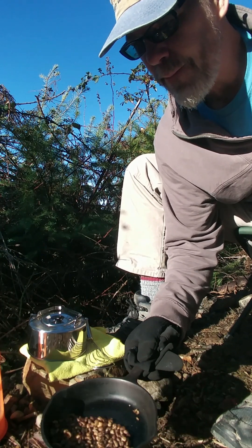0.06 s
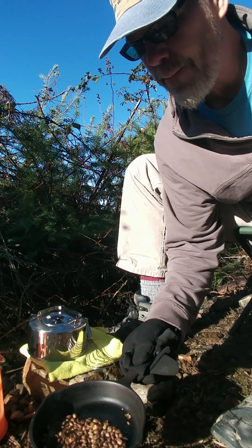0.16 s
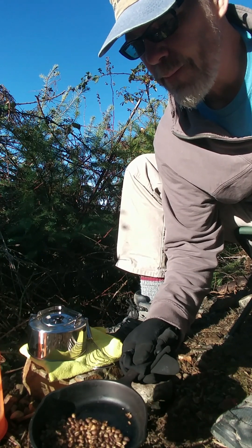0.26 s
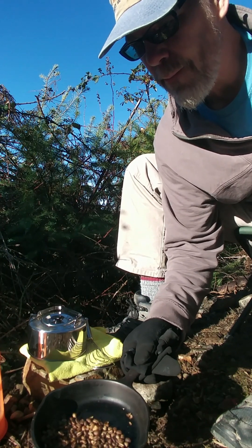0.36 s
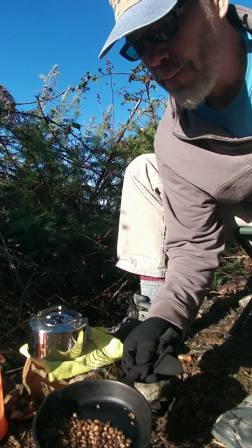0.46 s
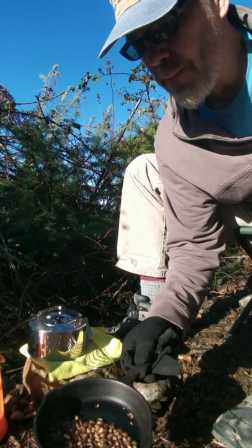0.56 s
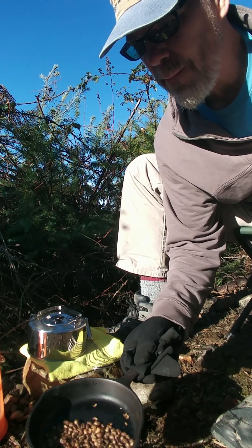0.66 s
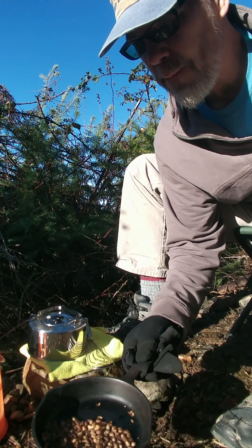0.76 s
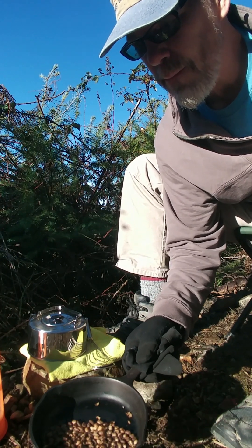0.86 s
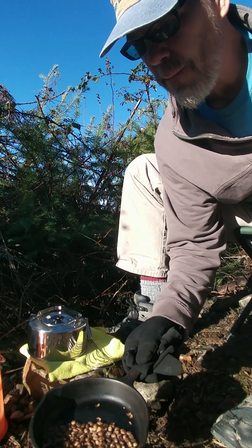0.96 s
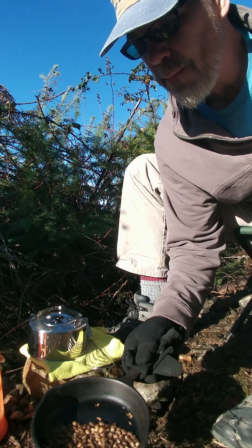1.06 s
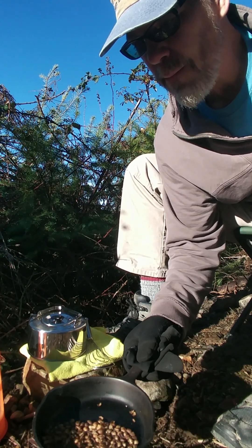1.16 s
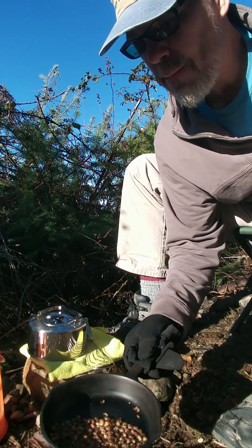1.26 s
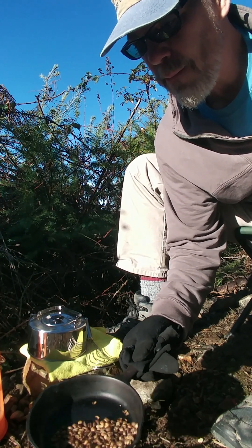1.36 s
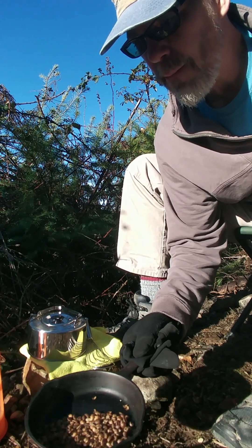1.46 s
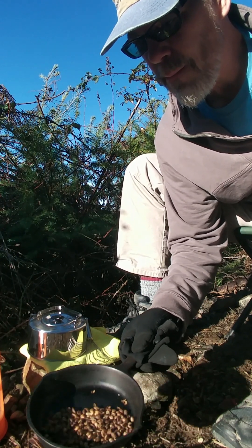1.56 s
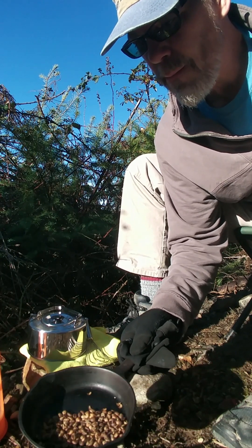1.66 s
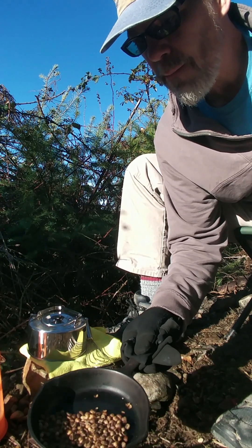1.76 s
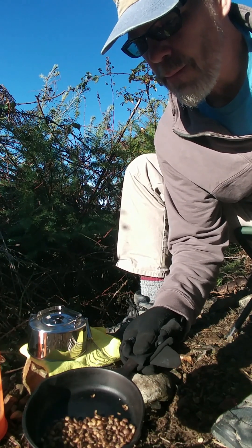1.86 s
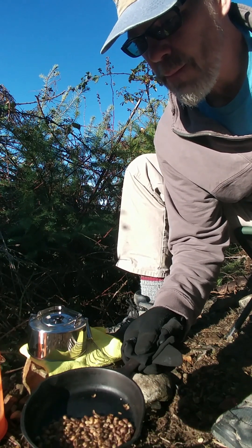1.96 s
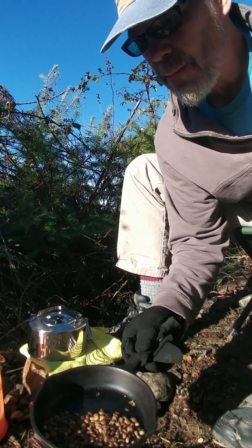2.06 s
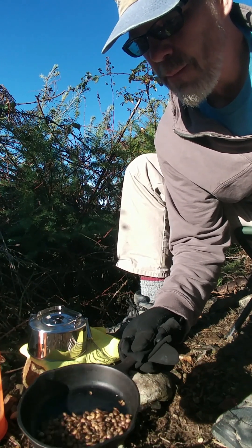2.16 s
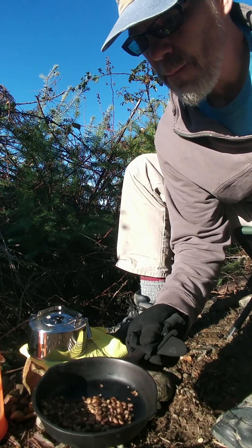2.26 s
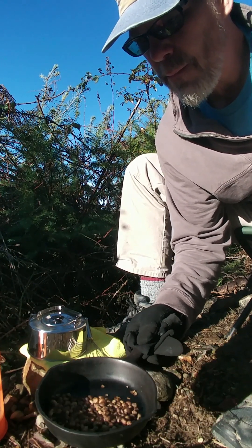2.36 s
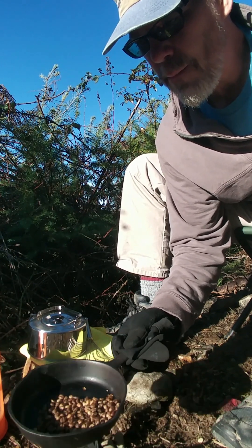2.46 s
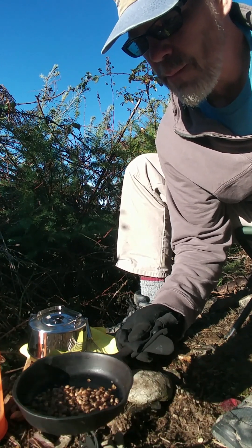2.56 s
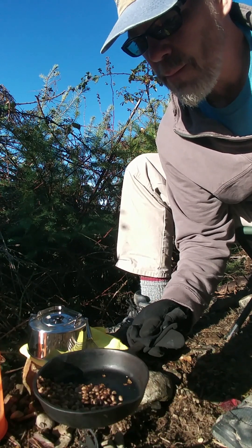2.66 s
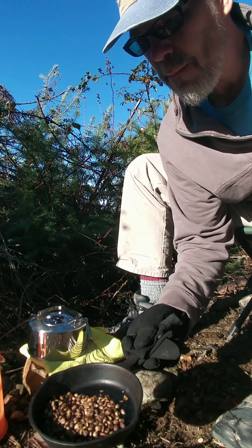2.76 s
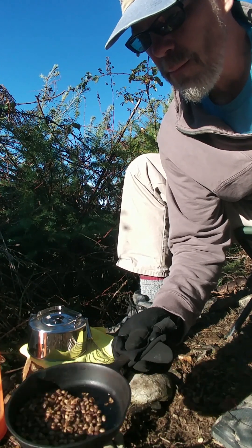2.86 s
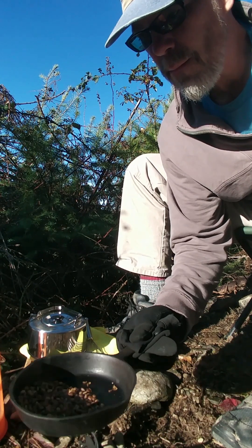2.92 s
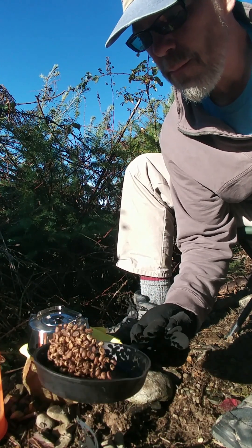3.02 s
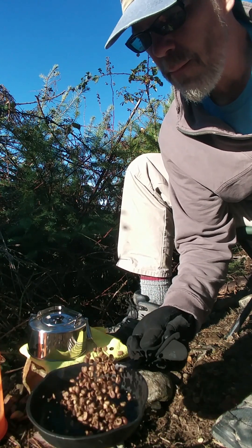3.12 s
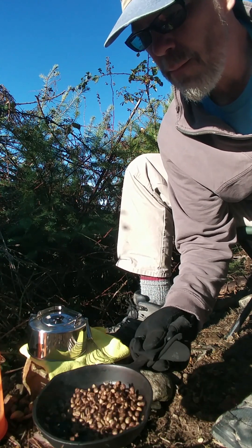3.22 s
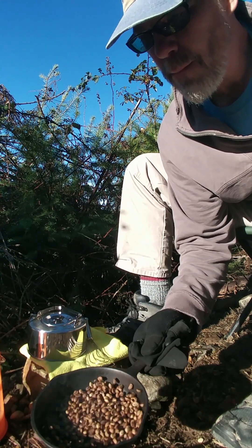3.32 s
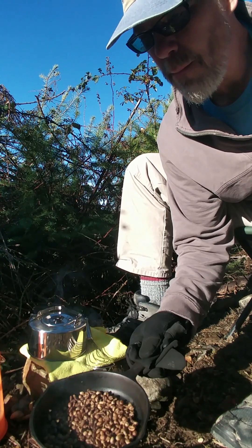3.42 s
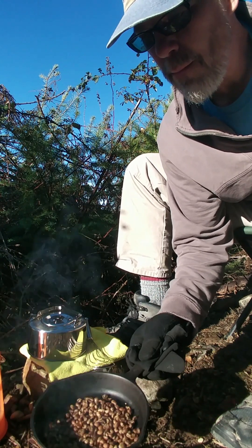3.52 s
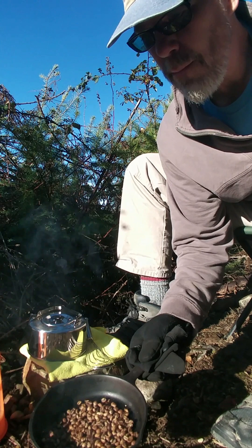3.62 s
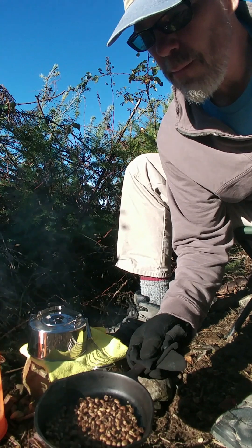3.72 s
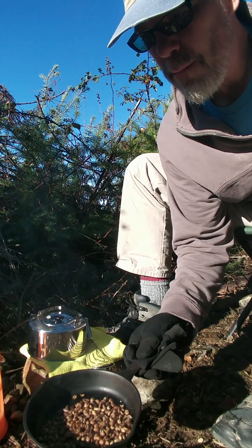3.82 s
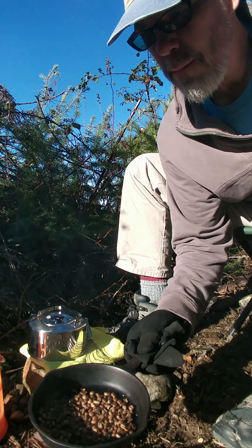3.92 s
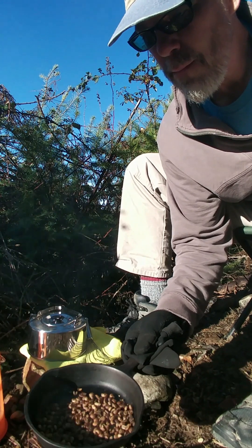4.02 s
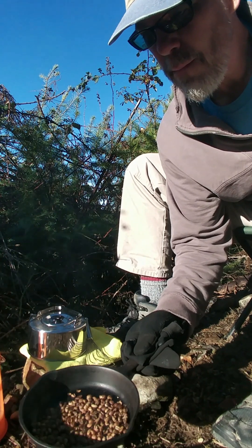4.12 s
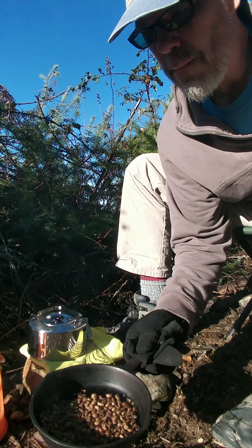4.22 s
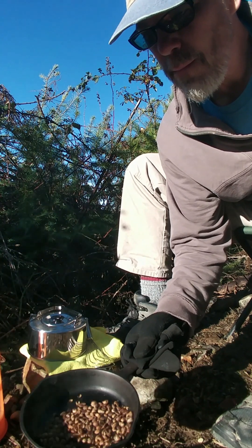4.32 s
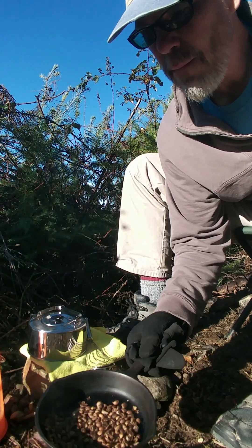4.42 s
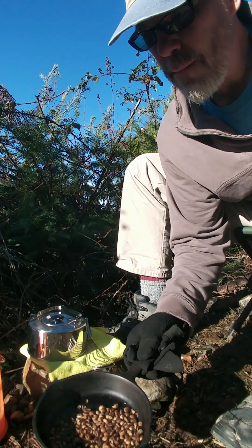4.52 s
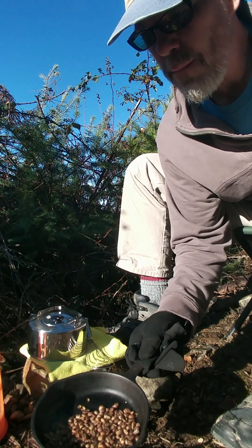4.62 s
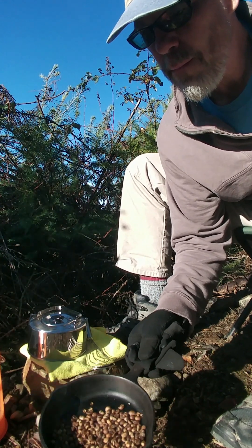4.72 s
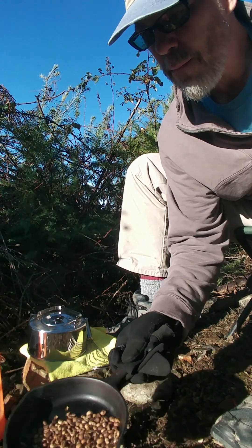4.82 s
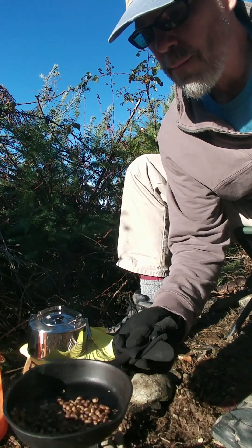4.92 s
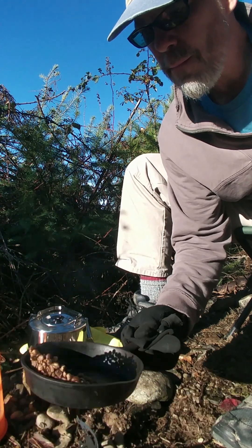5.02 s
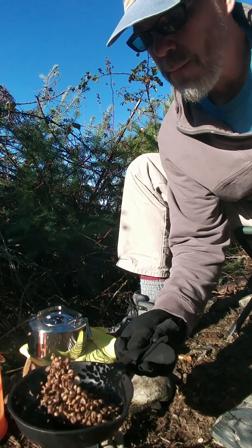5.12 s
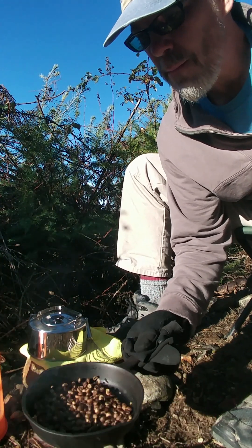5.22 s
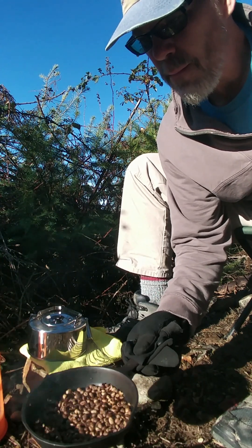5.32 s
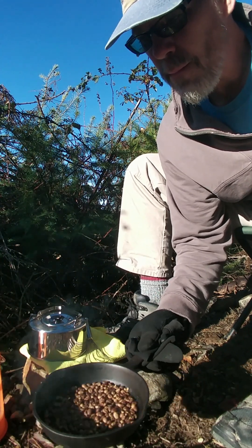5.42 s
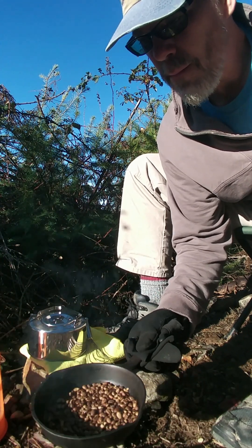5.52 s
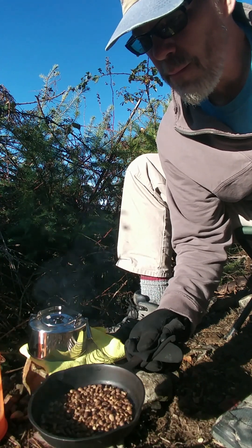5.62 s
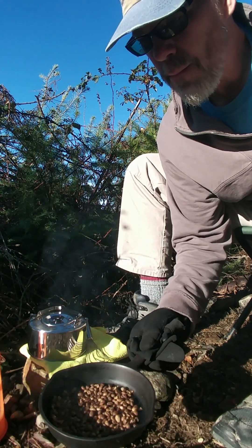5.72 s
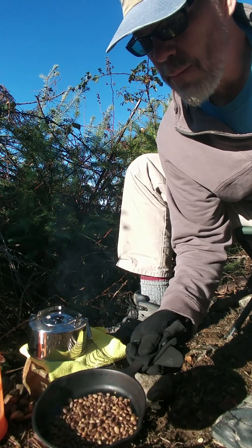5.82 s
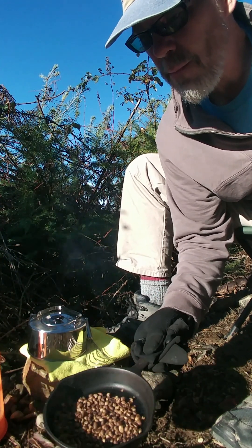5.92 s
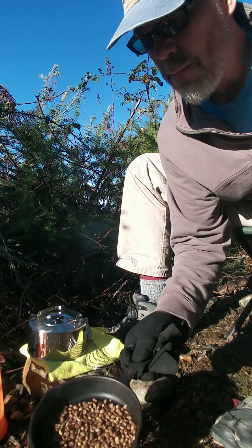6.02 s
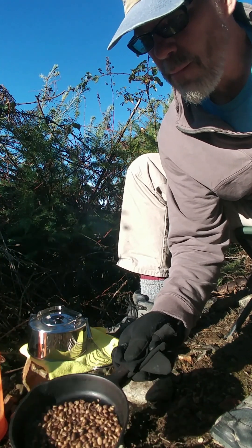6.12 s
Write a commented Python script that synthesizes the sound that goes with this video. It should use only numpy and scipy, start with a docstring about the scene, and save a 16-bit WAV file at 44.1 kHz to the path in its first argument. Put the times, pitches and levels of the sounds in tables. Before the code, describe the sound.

Coffee beans crack sharply and roll in a small metal pan, tossed twice with ringing clatter over a softly roaring, hissing gas burner outdoors.

```python
"""Coffee beans crack, roll and are tossed twice in a small metal pan over a camping burner outdoors.
Cracks are filtered snaps with steam; moving beans are random taps that ring the pan's modes and tick.
The flame roars and the gas hisses as coloured noise. Far off a machine hums and an engine pulls away
through its gears, both as wavering tones. A phone hears pan and burner from its right, a metre away."""
import sys
import numpy as np
from scipy import signal
from scipy.fft import rfft, irfft
from scipy.io import wavfile
from scipy.ndimage import uniform_filter1d

SR = 44100
rng = np.random.default_rng(int(sys.argv[2]) if len(sys.argv) > 2 else 0)


def to_wav(s):
    """Save 16-bit WAV."""
    ch = np.atleast_2d(s).T  # columns
    pcm = np.round(np.clip(ch, -1, 1) * 32767)  # PCM
    wavfile.write(sys.argv[1], SR, pcm.astype(np.int16))


N = 272538

PAN_LAG, FLAME_LAG = 11, 12  # samples by which the left port hears later


def undb(db):
    """Turn decibels into an amplitude factor."""
    return 10 ** (np.asarray(db) / 20)


def curves(table):
    """Draw straight lines through rows (t/s, ..); give each column at every sample."""
    s, *columns = np.transpose(table)
    return [np.interp(np.arange(N) / SR, s, column) for column in columns]


def colour(x, points, size=8192):
    """Filter by a response through points (f/Hz, level/dB) that never sounds ahead of its input."""
    hz, db = np.transpose(points)
    grid_hz = np.arange(1, size // 2 + 2) * SR / size
    response_db = np.interp(np.log(grid_hz), np.log(hz), db)
    # folding the cepstrum (the spectrum of the log response) gives minimum phase
    cepstrum = irfft(np.log(undb(response_db)))
    cepstrum[1:size // 2] *= 2
    cepstrum[size // 2 + 1:] = 0
    impulse = irfft(np.exp(rfft(cepstrum)))
    return signal.oaconvolve(np.atleast_2d(x), impulse[None], axes=-1)[:, :np.shape(x)[-1]]


def band(x, hz, width):
    """Resonate around one frequency, with gain 1 at the centre."""
    return signal.lfilter(*signal.iirpeak(hz, hz / width, fs=SR), x)


def unit(x):
    """Scale to mean power 1."""
    return x / np.sqrt(np.mean(x ** 2))


def walk(rate):
    """Wander at random with a spread near 1: levels held for 1 / rate seconds, smoothed twice."""
    hold = int(SR / rate)
    steps = np.repeat(rng.standard_normal(N // hold + 1), hold)
    return unit(uniform_filter1d(uniform_filter1d(steps, hold), hold)[:N])


def ports(like, lag, apart_hz=350):
    """White noise of 0 dB per Hz at two ports: alike in the bass, less so above, later on the left."""
    right, other = rng.standard_normal((2, N)) * np.sqrt(SR / 2)
    high_pass = signal.butter(2, apart_hz, "high", fs=SR)
    difference = signal.lfilter(*high_pass, np.roll(other - right, lag))
    return np.array([np.roll(right, lag) + (1 - like) * difference, right])


def cracks(scatter_db=-24, scatter_t60=0.03, ground_s=.0026, ground=0.21, like=0.24, rise_s=0.0028, gain_db=4):
    """A shell splits in a snap that pan wall and ground throw back; steam fizzes out after it."""
    # cracking beans: t/s (the snap sounds at t + 0.001286 s), peak of the snap before gain_db/dB,
    # thud/dB, shell/dB, split/dB, air/dB, pitch of the shell band f/Hz, pan wall echo after/s,
    # steam/dB, steam's 60 dB decay/s, left minus right/dB
    bean_cracks = [(0.049, -47, -22, -8, -1, -10, 4500, .0004, -2, .06, -2),
                   (0.6359, -13.5, -14, -2.5, -0.5, 3, 4270, .0004, -13, 0.057, 0.5),
                   (.657, -29, -30, -5, -3, -7, 5000, .0004, -12.5, 0.14, -3),
                   (0.733, -8, -4.5, 1, -11, -14, 4040, .00047, -13, 0.084, 1.5),
                   (1.4759, -2.5, -44, 9, 7.5, 5.5, 5840, .00088, -23, 0.095, -1.5),
                   (1.6067, -18, -26, -6, 0, 5, 4560, .0004, -14.5, 0.093, -2.5),
                   (2.2613, -39.5, -32, -1, -4, -8, 5000, .0004, -8, 0.052, 0),
                   (3.0929, -29, 0.5, -2, -3, -20, 5020, .0004, -11, 0.081, 2),
                   (4.1531, -4, -22.5, -1.5, -1.5, 1.5, 4850, .00025, -14, 0.1, 0.5),
                   (5.5818, -26.5, -9.5, -6.5, -9, -2.5, 4503, .0004, -15, 0.091, 1)]
    # thud, shell, split and air bands: f/Hz (the shell's is set by each bean), width/Hz
    snap_bands = [(1400, 3100), (4200, 3000), (8300, 2040), (13500, 5100)]
    # colour of the steam: f/Hz, level/dB
    steam_colour = [(600, -20), (2500, -15.5), (3200, -4), (4500, -8.5), (6000, 0.5), (8500, -2.5),
                    (12000, -7), (16000, -10)]
    wall = .7  # share that the pan wall throws back
    out = np.zeros((2, N))
    t = np.arange(SR // 6) / SR
    for s, db, *bands_db, shell_hz, wall_s, steam_db, steam_t60, pan_db in bean_cracks:
        click = (t == 0) * 1.
        click = click + wall * np.roll(click, int(wall_s * SR)) + ground * np.roll(click, int(ground_s * SR))
        # neighbouring beans scatter the snap into a short rough tail
        click = click + rng.standard_normal((2, len(t))) * undb(scatter_db - 60 * t / scatter_t60)

        bands = np.array(snap_bands)
        bands[1, 0] = shell_hz
        snap = 0
        for (hz, width), band_db in zip(bands, bands_db):
            part = band(band(click, hz, width), hz, width)
            snap = snap + undb(band_db) * part / np.abs(part).max()
        snap = snap / np.abs(snap).max()

        puff = undb(steam_db - 60 * t / steam_t60) * (1 - np.exp(-t / rise_s))
        right, other = rng.standard_normal((2, len(t))) * puff
        steam = colour(np.array([like * right + (1 - like) * other, right]), steam_colour, size=512)

        balance_db = np.array([[pan_db], [-pan_db]]) / 2
        sound = (snap + steam) * undb(db + gain_db + balance_db)
        snap_s = s + 0.001286
        i = int(snap_s * SR)
        out[0, i + PAN_LAG:i + PAN_LAG + len(t)] += sound[0]
        out[1, i:i + len(t)] += sound[1]
    return out


def swell(start, length, db, rise, fall):
    """Level in dB that climbs to db at start, holds and falls away; slopes in dB per s."""
    t = np.arange(N) / SR - start
    return db - rise * np.maximum(-t, 0) - fall * np.maximum(t - length, 0)


def motion():
    """Ring level and extra dB on low modes, high modes and clatter; the loudest movement sets all four."""
    # beans rolling gently about: t/s, ring level/dB
    rolling = [(0.0, -82.5), (1.25, -80), (1.5, -69), (2.2, -76), (2.9, -66), (3.7, -74), (4.5, -70),
               (5.0, -73), (5.7, -71.5), (6.18, -74.5)]
    # short slides of the heap: start t/s, length/s, ring level/dB, extra on the low modes/dB,
    # extra on the high modes/dB
    heap_slides = [(0.037, 0.057, -63.5, -11, 2.5), (1.30, .06, -65, -6, -6), (2.119, .03, -61.5, -7, -15),
                   (2.25, 0.045, -58, -1.5, 5), (2.385, 0.078, -52, -5.5, -1.5),
                   (2.515, 0.064, -58.5, 5.5, 6.5), (2.776, .035, -51.5, -8.5, 0.5),
                   (2.876, 0.02, -61.5, 4, 0), (3.895, .12, -70.5, 1, -5), (4.266, .08, -67.5, -5, -8),
                   (4.508, .07, -62, -16, -26), (4.738, 0.056, -67, -4, 2), (5.819, 0.058, -62.5, -14, -8),
                   (6.138, .03, -67, 10, 0)]
    # tosses of the heap: bulk starts to land t/s, keeps pouring for/s, ring level at the end/dB,
    # build-up over the pour/dB, extra on the low modes/dB, extra on the high modes at start/dB
    # and at end/dB, extra clatter/dB, stragglers relative to the bulk/dB, stragglers stop after/s
    heap_tosses = [(3.14, .097, -29, 4, -1.5, 4.1, 10.1, 0, -13.5, .3),
                   (5.13, 0.072, -29.5, 7.8, 2.1, 6.3, 1.1, 0, -12.5, 0.17)]
    slide_rise, slide_fall = 700, 392  # dB per s
    toss_rise, toss_fall, straggle_fall = 516, 460, 69.5  # dB per s
    airborne_s = .15  # the rolling hushes this long before the bulk lands
    bare_low_db, bare_clatter_db = 10.5, 8.5  # the first beans strike bare metal
    last_low_db, last_high_db, last_clatter_db = -1.5, -5, 5.5  # later ones fall on beans

    t, flat = np.arange(N) / SR, np.zeros(N)
    roll_db = curves(rolling)[0]
    moves = []
    for s, length, db, low_db, high_db in heap_slides:
        slide_db = swell(s, length, db, slide_rise, slide_fall)
        moves.append((slide_db, flat + low_db, flat + high_db, flat))
    for s, length, db, build_db, deep_db, first_db, bright_db, clatter_db, rest_db, rest_s in heap_tosses:
        roll_db = np.where((t > s - airborne_s) & (t < s), -90, roll_db)
        end = s + length
        stragglers = swell(end, 0, db + rest_db, toss_rise, straggle_fall)
        stragglers = stragglers - toss_fall * np.maximum(t - end - rest_s, 0)
        bulk = swell(s, length, db, toss_rise, toss_fall) - np.interp(t, (s, end), (build_db, 0))
        low = deep_db + np.interp(t, (s, s + length / 2), (bare_low_db, last_low_db))
        high = np.interp(t, (s, end, end + length / 2), (first_db, bright_db, last_high_db))
        ticks = np.interp(t, (s - length / 2, s, end, end + length / 2),
                          (bare_clatter_db, 0, 0, last_clatter_db))
        moves.append((np.maximum(bulk, stragglers), low, high, ticks + clatter_db))
    moves.append((roll_db, flat, flat, flat))
    moves = np.array(moves)
    loudest = moves[:, 0].argmax(axis=0)
    return moves[loudest, :, np.arange(N)].T


def taps(ring_db, idle_rate=1100, toss_rate=3000, spread_db=3.0, clump_db=1.5):
    """Bean impacts of mean power 1; they come in clumps, more per second where the ring is louder."""
    rate = idle_rate + toss_rate * undb(ring_db - ring_db.max()) ** .5
    scatter_db = spread_db * np.minimum(rng.exponential(size=N), 3.5)
    size = undb(scatter_db + clump_db * walk(90))
    hits = rng.random(N) < rate / SR
    # more taps are each made weaker, so that their number does not set the level
    return unit(hits * size * np.sqrt(toss_rate / rate))


def pan(blows, low_db, high_db, apart=0.56, surge_db=2.0, follow=0.68):
    """Every impact rings the modes in its own mix, since each bean lands somewhere else."""
    # how each pan mode rings, before the extras: level/dB, 60 dB decay/s, signed factor for the left port
    pan_modes = [(-8, 0.15, 0.83), (-10.5, 0.13, -0.25), (-5, 0.16, -1.18), (0.5, 0.15, 1.31),
                 (-38, .15, -8), (-15.5, 0.15, 2.5), (-3.5, 0.17, -1), (-15, .15, 1.9),
                 (-7.5, 0.071, -0.54), (-25, .08, 3), (-24, .08, -0.3), (-17.5, .08, -2.5),
                 (-8.5, 0.062, -0.34), (-7.5, 0.11, 0.16), (-8.5, 0.15, -0.6), (-4, 0.095, -0.1),
                 (-2.5, .12, -0.2), (-10, 0.057, 1.8), (-31, .12, -6), (-18, .06, 1.7), (-27, .06, -0.5),
                 (-13, 0.074, 1), (-23, .03, -1.1)]
    # pitches of the same modes, in the same order: f/Hz
    pan_mode_hz = [1143, 2090, 2157, 3316, 3564, 4000, 4877, 5475, 5590, 5800, 6480, 6760, 7340, 8055, 8408,
                   8745, 8790, 8838, 9340, 5680, 6620, 9560, 13370]
    out = np.zeros((2, N))
    for hz, (db, t60, left) in zip(pan_mode_hz, pan_modes):
        pole = np.exp(2j * np.pi * hz / SR - np.log(1000) / (t60 * SR))
        tilt = np.interp(hz, (2200, 3300, 8800), (-1, 0, 1))  # -1 is a low mode, 1 a high one
        extra_db = (low_db if tilt < 0 else high_db) * abs(tilt)
        if 5300 < hz < 6000:  # this cluster comes and goes with the low modes
            extra_db = extra_db + follow * low_db
        # the sliding heap feeds each mode in surges
        gain = undb(db + extra_db + surge_db * walk(60))
        kicks = blows * gain * rng.standard_normal((2, N))
        ring = signal.lfilter([np.sqrt(1 - abs(pole) ** 2)], [1, -pole], kicks).imag
        out += [left * np.roll(ring[0] + apart * ring[1], PAN_LAG + 1), ring[0]]
    return out


def clatter(blows, db=-76, t60=0.016, like=0.42):
    """Dry ticks of bean on bean and bean on metal: each blow sets off a short burst of noise."""
    # colour of the ticks: f/Hz, level/dB
    tick_colour = [(800, -39), (1300, -3), (2400, 0), (4000, -5), (5600, 12), (9000, 0.5), (13300, -10.5),
                   (16000, -5)]
    burst = signal.lfilter([1], [1, -np.exp(-np.log(1000) / (t60 * SR))], blows)
    return undb(db) * colour(burst * ports(like, PAN_LAG), tick_colour)


def flame(like=0.77, level_db=0.5, flutter_db=1.41):
    """The burner's roar: fluttering noise, coloured by the gap under the pan."""
    # colour of the roar before level_db: f/Hz, level per Hz/dB
    roar_colour = [(28, -106), (38, -87), (50, -78), (70, -70.5), (110, -70.5), (160, -75.5), (250, -77.5),
                   (350, -73), (470, -72), (620, -86.5), (800, -77.5), (1100, -75.5), (1300, -85),
                   (1500, -91.5), (2000, -104)]
    # left port relative to the right: f/Hz, level/dB
    roar_left = [(90, -2.5), (250, -4), (500, -0.5), (650, -4), (800, 2.5), (1200, -7)]
    roar = colour(ports(like, FLAME_LAG), roar_colour)
    left, right = roar * undb(level_db + flutter_db * walk(6.9))
    return np.array([colour(left, roar_left)[0], right])


def gas(like=0.12, flicker_db=2.5):
    """Smooth jet hiss; whistle and high sizzle swell with it, a sizzle band by itself; each band flickers."""
    # how freely the jet is heard, more as the pan is lifted off the burner: t/s, share (0 to 1)
    jet_openness = [(0.0, 0.34), (.4, 0.2), (1.2, 0.08), (1.45, 0.45), (1.52, 0.83), (1.7, 0.55),
                    (2.3, 0.62), (2.5, 1), (2.9, 0.7), (3.2, .8), (3.45, 0.46), (4.05, .6), (4.7, 0.34),
                    (5.0, 0.61), (5.2, 0.78), (5.55, .7), (5.85, 0.75), (6.18, 0.3)]
    # level of the sizzle band: t/s, level/dB
    sizzle_level = [(0.0, -61), (.6, -58), (1.12, -64.5), (1.25, -69), (1.5, -72), (2.1, -66), (2.9, -82),
                    (3.5, -78), (3.64, -53), (3.75, -73), (4.4, -70), (4.65, -56), (4.85, -68), (5.0, -86),
                    (5.7, -76), (5.9, -63), (6.18, -64)]
    # whistle, sizzle and high sizzle: f/Hz, width/Hz
    jet_bands = [(3780, 260), (6750, 500), (8800, 3100)]
    # colour of the hiss before the jet's openness: f/Hz, level per Hz/dB
    hiss_colour = [(1500, -104), (2800, -102), (4400, -100), (5200, -101), (6200, -92.5), (9000, -96),
                   (13000, -92.5), (15700, -98.5)]
    # left port relative to the right, for hiss and bands: f/Hz, level/dB
    gas_left = [(1500, 7), (4000, -5), (8000, -3.5), (15000, -10)]
    freely = curves(jet_openness)[0]
    # from a share of 0 to a share of 1, in dB
    hiss_db = -2.5 + (2 + 2.5) * freely
    whistle_db = -78.5 + (-50.5 + 78.5) * freely
    high_db = -77.5 + (-50 + 77.5) * freely
    bands_db = whistle_db, curves(sizzle_level)[0], high_db

    out = undb(hiss_db) * colour(ports(like, FLAME_LAG), hiss_colour)
    for (hz, width), db in zip(jet_bands, bands_db):
        level = undb(db + flicker_db * walk(26))
        noise = ports(like, FLAME_LAG)
        out += level * unit(band(band(noise, hz, width), hz, width))
    return np.array([colour(out[0], gas_left)[0], out[1]])


def drone(hz, db, second_db, waver_db):
    """A low tone with its octave, wavering on the way through the air."""
    phase = 2 * np.pi * np.cumsum(hz) / SR
    tone = np.sin(phase) + undb(second_db) * np.sin(2 * phase)
    return np.sqrt(2) * undb(db + waver_db * walk(8)) * tone


def hum():
    """A far machine's drone, whose pitch and level drift."""
    # t/s, f/Hz, level/dB
    hum_path = [(0.0, 88.6, -55), (1.3, 89.94, -55.5), (2.2, 89.36, -54), (3.92, 90.3, -46.5),
                (5.28, 89.96, -52.5), (6.18, 91.4, -49)]
    return drone(*curves(hum_path), second_db=-17.0, waver_db=3.0)


def engine():
    """A far engine's drone: the pitch climbs steadily in each gear and slides down between gears."""
    # gears: engaged t/s, starting f/Hz, climb/(Hz per s), released t/s
    gear_runs = [(2.3, 45, 25, 2.89), (3.41, 48.3, 10.5, 4.6), (5.15, 60, 13.5, 6.18)]
    # t/s, level/dB
    engine_level = [(2.1, -83), (2.4, -59), (3.07, -56.5), (3.6, -59), (4.2, -51), (5.0, -60), (5.7, -57),
                    (6.18, -45)]
    turns = []
    for s, hz, climb, end in gear_runs:
        turns += [(s, hz), (end, hz + climb * (end - s))]
    return drone(*curves(turns), *curves(engine_level), second_db=-21, waver_db=2.0)


def scene():
    """Add up beans, burner and the two far drones at the left and right port."""
    ring_db, low_db, high_db, clatter_db = motion()
    blows = undb(ring_db) * taps(ring_db)
    beans = pan(1.476 * blows, low_db, high_db) + clatter(blows * undb(clatter_db)) + cracks()
    return beans + flame() + gas() + hum() + engine()


def record(dry, ceiling=.95, top_hz=16900):
    """The phone's ports dip above the presence peak, the loudest peaks are rounded and the top is cut."""
    # response of the ports: f/Hz, level/dB
    port_response = [(8000, 1.5), (9500, 3.5), (10600, -8), (11800, -5.5), (13000, -2), (15000, -3.5),
                     (15750, 0), (15900, -8)]
    heard = colour(dry, port_response)
    heard = heard / (1 + (heard / ceiling) ** 4) ** .25
    return signal.sosfilt(signal.ellip(8, .2, 70, top_hz, fs=SR, output="sos"), heard)


dry = scene()
out = record(dry)
to_wav(out)
```